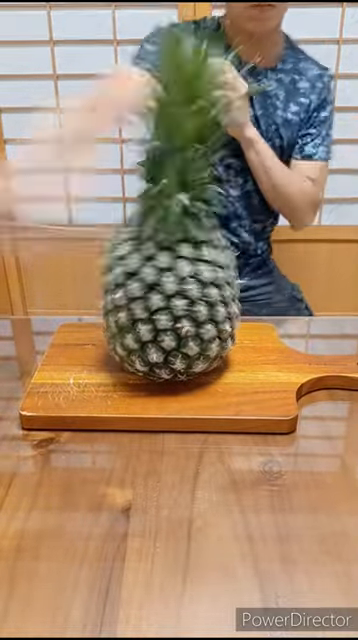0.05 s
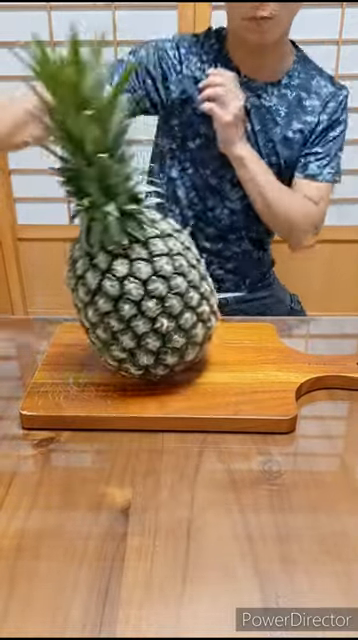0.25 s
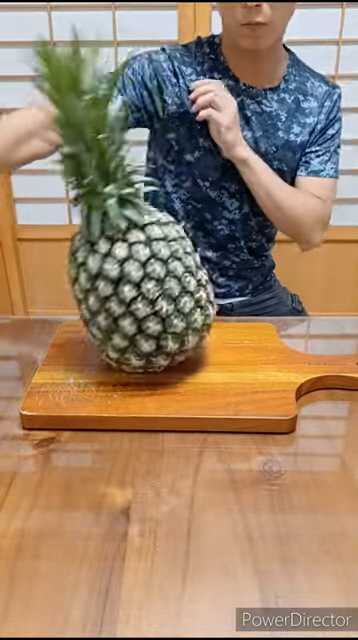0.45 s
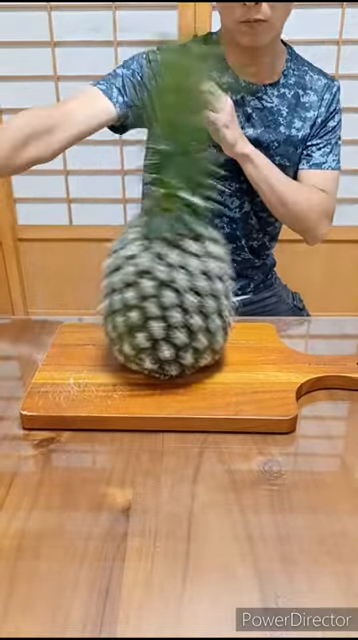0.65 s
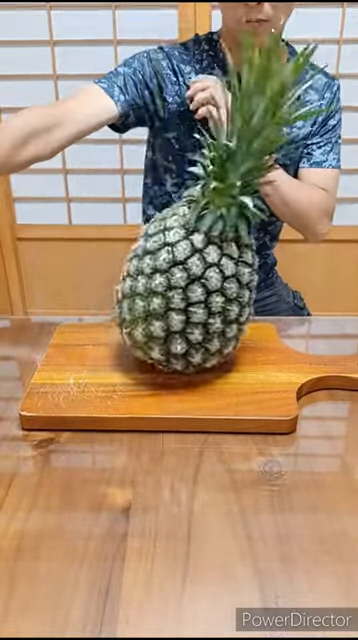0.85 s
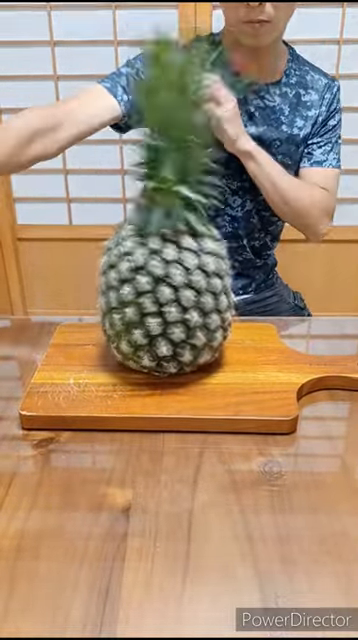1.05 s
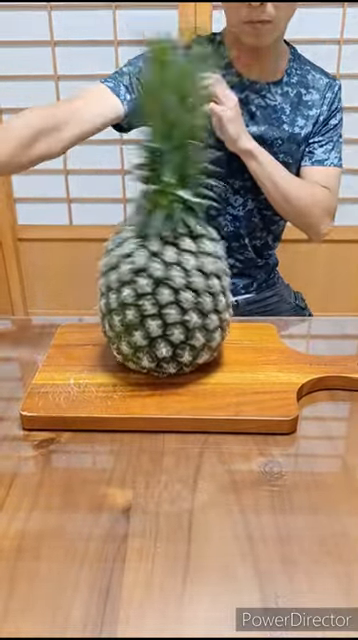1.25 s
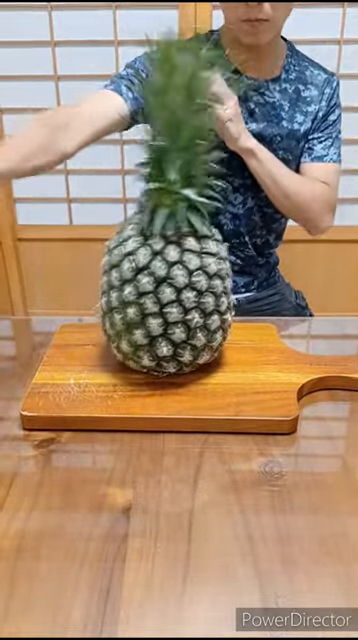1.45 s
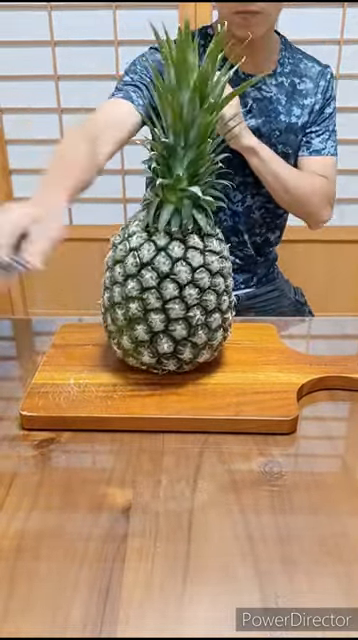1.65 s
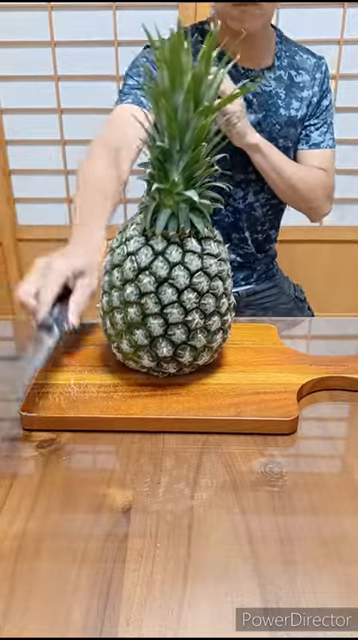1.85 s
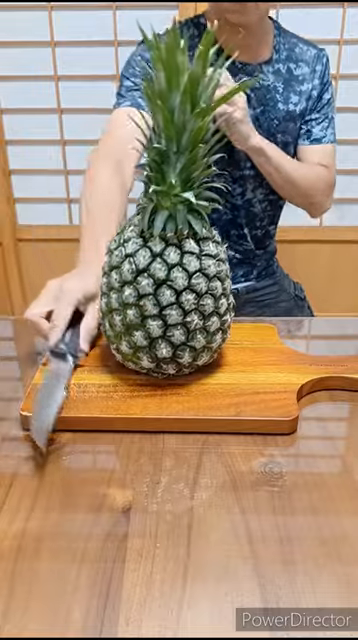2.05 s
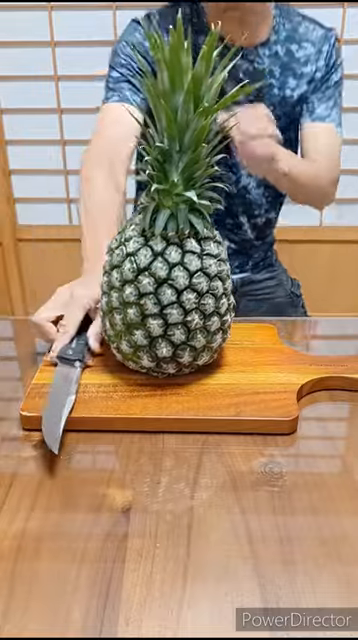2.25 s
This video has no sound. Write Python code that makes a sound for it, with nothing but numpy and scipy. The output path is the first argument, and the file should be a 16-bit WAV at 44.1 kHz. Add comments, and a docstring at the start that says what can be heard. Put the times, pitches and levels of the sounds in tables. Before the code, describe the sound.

A knife chops sharply through a pineapple on a wooden board, then the fruit rocks softly.

```python
"""One fast knife stroke through a pineapple on a wooden board on a table, in a bare, ringing room.
The swing swishes in. At 0.2 s the blade splits the rind, knocks fruit and board and tears the fibres;
the steel rings, the table top hums, and the sleeve flaps as the arm stops.
From 0.6 s the fruit rocks to rest with low thuds: its base rumbles, the wet cut crackles, the rind ticks.
Its leaves rustle on the last tilts and the sleeve brushes back, over a quiet room tone."""
import sys
import numpy as np
from scipy import signal
from scipy.fft import rfft, irfft, next_fast_len
from scipy.io import wavfile

SR = 44100
rng = np.random.default_rng(int(sys.argv[2]) if len(sys.argv) > 2 else 0)


def inscribe(sig):
    """Save sig as 16-bit PCM at rate SR to the path in sys.argv[1].

    A 1-D sig is mono; a 2-D sig holds one channel per row.
    Samples are clipped to [-1, 1] before scaling.
    """
    pcm = np.round(np.clip(np.atleast_2d(sig).T, -1, 1) * 32767)
    wavfile.write(sys.argv[1], SR, pcm.astype(np.int16))


N = 101429
T = np.arange(N) / SR
CUT_S, TABLE_PAN_DB = .1972, -2

# blade blows: t/s, length/s, f/Hz, thump level/dB, board drive/dB
KNOCKS = [(.1990, .011, 256, -17.5, -24.5), (.2090, 0.017, 126.9, -23, -35), (.2250, .012, 204.8, -19, -33)]
# landings of the rocking fruit: t/s, length/s, f/Hz, level/dB
THUDS = [(.8135, 0.035, 120.8, -33), (1.188, 0.027, 119, -46), (1.222, 0.036, 90, -47),
         (1.426, .042, 117.8, -42), (1.474, 0.029, 115, -49.5), (1.598, 0.044, 107, -48.5),
         (1.632, 0.022, 101, -47.5)]


def cut():
    """Fibres snap in a dense burst as the blade passes."""
    # snap spectrum: f/Hz, relative density/dB
    spectrum = [(200, -8.5), (600, 2), (1150, -7), (1900, 2.5), (2300, 1.5), (2800, 3), (3800, -1),
                (6000, -4.5), (9000, -8), (13500, -3), (16000, -14)]
    snaps = stereo(grains(per_s=9000, spread_db=2), spectrum, width=1.25)
    return from_db(-27) * burst(CUT_S, attack_s=.0057, hold_s=.019, t60_s=.1) * snaps


def splits():
    """The hard rind bursts ahead of the blade in short, bright cracks."""
    # cracks: t/s, level/dB
    cracks = [(0.1984, -27), (0.2043, -25.5), (.2120, -29)]
    # crack spectrum: f/Hz, relative density/dB
    spectrum = [(400, -6), (900, 1.5), (2000, -6.5), (4000, -8), (7500, 4.5), (11000, -1.5), (14000, -0.5),
                (16000, -5.5)]
    envelope = bursts(cracks, attack_s=.0008, hold_s=.0026, t60_s=.022)
    return envelope * stereo(grains(per_s=16000, spread_db=1.5), spectrum)


def knocks():
    """The blade meets rind, core and far rind; each blow passes into the board."""
    thumps = bumps([row[:4] for row in KNOCKS])
    ring = board([(s + .0005, drive_db) for s, _, _, _, drive_db in KNOCKS])
    return panned(lagged(thumps + ring, right_lag_s=-.00015), db=-1)


def board(blows):
    """Blows (t/s, level/dB) ring the modes of fruit, board and table."""
    # modes: f/Hz, gain/dB, t60/s
    modes = [(89.2, -14, 0.12), (129.06, -6, .4), (207.9, -6, .21), (245, -10, .36), (273.3, -5.5, .18),
             (336.2, -3.5, .17), (433.8, -0.5, 0.1891), (556, -9.5, 0.22), (617.3, -12, .19),
             (699, -17, .16), (951.6, -18, .11)]
    impulses, ring = np.full(N, 1e-18), 0
    for s, db in blows:
        impulses[int(s * SR)] += from_db(db)
    for k, (hz, db, t60_s) in enumerate(modes):
        radius, angle = np.exp(-np.log(1000) / (t60_s * SR)), 2 * np.pi * hz / SR
        mode = signal.lfilter([0, np.sin(angle)], [1, -2 * radius * np.cos(angle), radius ** 2], impulses)
        ring = ring + (-1) ** k * from_db(db) * mode
    return butterworth(ring, "high", hz=79)


def blade():
    """The struck steel rings on; each mode has its own phase on each side."""
    # modes: f/Hz, level/dB, t60/s
    modes = [(1610, -45, .75), (1953, -37, .4), (2758, -36, .45), (3183, -40, .45), (7943, -41, .3)]
    phases = rng.uniform(0, 2 * np.pi, (len(modes), 2, 1))
    return sum(from_db(db) * burst(CUT_S, .015, 0, t60_s) * np.sin(2 * np.pi * hz * T + phase)
               for (hz, db, t60_s), phase in zip(modes, phases))


def thuds():
    """Each soft landing of the rocking fruit thumps and faintly rings the board."""
    ring = board([(s + .01203, db - 20.5) for s, _, _, db in THUDS])
    soft_ring = butterworth(ring, "low", hz=300)
    return panned(lagged(bumps(THUDS) + soft_ring, right_lag_s=.0004), TABLE_PAN_DB)


def swing():
    """Blade and sleeve hiss and push a puff of air; both swell until the blade lands."""
    # hiss spectrum: f/Hz, relative density/dB
    hiss_spectrum = [(200, 5.5), (600, 4.5), (1500, -6), (5000, -6), (11000, -7), (16000, -12)]
    # pushed-air spectrum: f/Hz, relative density/dB
    puff_spectrum = [(30, -32), (90, -9.5), (200, 0.5), (400, -10.5), (1000, -21), (4000, -43.5)]
    start_s, attack_s, hiss_db_per_s, puff_db_per_s = .087, .02, 139.5, 422
    gate = burst(start_s, attack_s, hold_s=CUT_S - start_s - attack_s, t60_s=.05)
    until_cut_s = np.maximum(CUT_S - T, 0)
    hiss = from_db(-63 - hiss_db_per_s * until_cut_s) * stereo(noise(), hiss_spectrum)
    puff = from_db(-46.5 - puff_db_per_s * until_cut_s) * stereo(noise(), puff_spectrum)
    return gate * (hiss + puff)


def sleeve():
    """The sleeve flaps as the arm stops and brushes as it comes back."""
    # rustles: t/s, hold/s, level/dB
    rustles = [(0.405, 0.023, -47), (0.518, 0.0082, -77), (1.724, 0.083, -82.5)]
    # cloth spectrum: f/Hz, relative density/dB
    spectrum = [(200, -7), (700, 0), (1300, 0.5), (2200, 5.5), (3500, -1.5), (6000, -8), (10000, -16.5),
                (16000, -22)]
    envelope = sum(from_db(db) * burst(s, .012, hold_s, t60_s=.18) for s, hold_s, db in rustles)
    return envelope * stereo(grains(per_s=8500, spread_db=1), spectrum)


def tilts():
    """The wet cut crackles and the knobbly base rumbles as the fruit rolls."""
    # rolls: t/s, attack/s, hold/s, crackle level/dB, rumble level/dB
    rolls = [(0.63, .025, 0.054, -84.5, -69), (0.833, 0.0043, 0.036, -66.5, -52),
             (1.201, 0.016, 0.023, -72, -58), (1.278, 0.014, 0.09, -106, -65),
             (1.428, .015, 0.069, -83.5, -64.5), (1.581, .015, 0.1, -83.5, -62.5)]
    # wet-cut spectrum: f/Hz, relative density/dB
    crackle_spectrum = [(300, 3.5), (1200, -10), (2300, 1), (3500, -2.5), (6000, -2), (9000, -4),
                        (13500, -4), (16000, -13)]
    # rolling-base spectrum: f/Hz, relative density/dB
    rumble_spectrum = [(25, -14), (55, 0), (110, -11), (170, -3.5), (240, 5), (340, -6.5), (500, -16.5),
                       (900, -24.5), (3000, -53)]
    crackle = stereo(grains(per_s=3500, spread_db=1), crackle_spectrum)
    rumble = panned(stereo(noise(), rumble_spectrum), TABLE_PAN_DB)
    out = 0
    for s, attack_s, hold_s, crackle_db, rumble_db in rolls:
        envelope = burst(s, attack_s, hold_s, t60_s=.21)
        out = out + envelope * (from_db(crackle_db) * crackle + from_db(rumble_db) * rumble)
    return out


def sway():
    """The first knock and each landing leave the table top swaying in a faint, deep hum."""
    hz, t60_s = 52.57, .63
    knock_s, _, _, knock_db, _ = KNOCKS[0]
    blows = [(knock_s, knock_db - 39)] + [(s, db - 24) for s, _, _, db in THUDS]
    hum = sum(from_db(db) * burst(s, .027, 0, t60_s) * np.sin(2 * np.pi * hz * (T - s)) for s, db in blows)
    return panned(hum, TABLE_PAN_DB)


def ticks():
    """Knobs of the rind touch the wood with a tiny crunch."""
    # contacts: t/s, level/dB
    contacts = [(0.816, -68), (1.185, -69.5), (1.567, -73.5)]
    # contact spectrum: f/Hz, relative density/dB
    spectrum = [(400, 0), (1000, 2), (1350, 5), (1900, -2), (2400, -3.5), (3500, -4.5), (7000, -13),
                (16000, -15)]
    envelope = bursts(contacts, attack_s=.0019, hold_s=.0036, t60_s=.065)
    return envelope * stereo(grains(per_s=3700, spread_db=-4.5), spectrum)


def leaves():
    """Stiff leaves brush each other in soft, bright swells."""
    # shakes of the crown: t/s, level/dB
    shakes = [(1.44, -76), (1.553, -73.5), (1.69, -87)]
    # leaf spectrum: f/Hz, relative density/dB
    spectrum = [(500, -12), (2000, 0), (3500, -5), (5200, 1), (7500, 2), (10000, -5), (13000, -7.5),
                (16000, -9)]
    envelope = bursts(shakes, attack_s=.028, hold_s=.033, t60_s=.25)
    return envelope * stereo(grains(per_s=12000, spread_db=1.5), spectrum)


def room_response():
    """A diffuse 1 s tail builds up quickly and dies at its own rate in each octave; unit energy."""
    # room decay: f/Hz, t60/s
    decay = [(60, 0.45), (200, 0.38), (600, 0.39), (2000, 0.34), (5000, 0.4), (10000, .42), (16000, 0.31)]
    delay_s, build_s, t = .0044, .008, T[:SR]
    bins = rfft(stereo(noise(), [(20, 0), (20000, 0)], width=1.1)[:, :SR])
    log_hz = np.log(np.maximum(np.arange(SR // 2 + 1), 1))
    centres_hz, tail = np.geomspace(60, 15360, 9), 0
    for hz, weights in zip(centres_hz, np.eye(len(centres_hz))):
        octave = irfft(bins * np.interp(log_hz, np.log(centres_hz), weights), SR)
        tail = tail + octave * 1e-3 ** (t / at_hz(decay, hz))
    return rms_one(tail * np.clip((t - delay_s) / build_s, 0, 1)) / np.sqrt(SR)


def room_tone():
    """Quiet, steady noise, mostly bass."""
    # room-tone spectrum: f/Hz, relative density/dB
    spectrum = [(25, -47), (40, -27), (56, -6.5), (75, -15), (126, -3.5), (178, -9), (232, -1), (297, -10),
                (400, -16), (552, -14.5), (900, -19), (1800, -32), (4400, -39.5), (9300, -41),
                (15500, -38.5)]
    return panned(from_db(-68) * stereo(noise(), spectrum), db=-.22)


def from_db(db):
    """Decibels to gain."""
    return 10 ** (np.asarray(db) / 20)


def rms_one(x):
    """Scale to rms 1."""
    return x / np.sqrt(np.mean(x ** 2) + 1e-20)


def at_hz(points, hz):
    """Read a table on a log-frequency axis."""
    points_hz, values = np.transpose(points)
    return np.interp(np.log(np.maximum(hz, 1)), np.log(points_hz), values)


def butterworth(x, kind, hz):
    """Second-order low-pass or high-pass."""
    return signal.sosfilt(signal.butter(2, hz, kind, fs=SR, output="sos"), x)


def noise():
    """Two white noises."""
    return rng.standard_normal((2, N))


def grains(per_s, spread_db):
    """Two streams of tiny snaps of uneven size."""
    size = from_db(spread_db * np.minimum(rng.exponential(1, (2, N)), 4))
    return size * rng.choice([-1, 1], (2, N)) * (rng.random((2, N)) < per_s / SR)


def burst(start_s, attack_s, hold_s, t60_s):
    """Linear attack, hold, exponential release."""
    release_s = np.maximum(T - start_s - attack_s - hold_s, 0)
    return np.clip((T - start_s) / attack_s, 0, 1) * 1e-3 ** (release_s / t60_s)


def bursts(events, attack_s, hold_s, t60_s):
    """Envelope with one burst per event (t/s, level/dB)."""
    return sum(from_db(db) * burst(s, attack_s, hold_s, t60_s) for s, db in events)


def bumps(blows):
    """Each blow on soft fruit swells and fades within a few low cycles."""
    out = 0
    for s, length_s, hz, db in blows:
        window = np.sin(np.pi * np.clip((T - s) / length_s, 0, 1)) ** 2
        out = out + from_db(db) * window * np.sin(2 * np.pi * hz * (T - s))
    return out


def stereo(streams, spectrum, width=1):
    """Colour two streams and mix them as mid and side, the bass alike left and right; rms 1."""
    # left-right likeness: f/Hz, correlation at width 1
    likeness = [(60, 1), (300, 0.8), (600, 0.55), (1200, 0.16), (4000, 0.16), (16000, 0.18)]
    size = next_fast_len(N)
    hz = np.arange(size // 2 + 1) * SR / size
    gain = from_db(at_hz(spectrum, hz)) * hz ** 2 / (hz ** 2 + 25 ** 2)  # roll-off below 25 Hz
    apart = np.clip((1 - at_hz(likeness, hz)) * width, 0, 1)
    mid, side = rfft(streams, size) * gain * np.sqrt([2 - apart, apart])
    return rms_one(irfft(np.array([mid + side, mid - side]), size)[:, :N])


def panned(x, db):
    """Left +db, right -db: negative leans right."""
    return x * from_db(db * np.array([[1], [-1]]))


def lagged(x, right_lag_s):
    """Mono to stereo, the right side shifted in time."""
    return np.array([x, np.interp(T - right_lag_s, T, x)])


def scene():
    """Sources sound directly and through the room; sway, swing and room tone stay dry."""
    # signal, room send/dB
    sources = [(splits(), -12), (cut(), 2), (blade(), -12), (knocks(), -7.5), (sleeve(), -8),
               (thuds(), -6.5), (ticks(), 4), (tilts(), -3.5), (leaves(), -3)]
    direct = sum(x for x, _ in sources)
    send = butterworth(sum(from_db(db) * x for x, db in sources), "high", hz=30)
    reverb = signal.fftconvolve(send, room_response(), axes=1)[:, :N]
    return direct + reverb + sway() + swing() + room_tone()


def record(dry):
    """Steep elliptic low-pass."""
    cutoff_hz = 15050
    return signal.sosfilt(signal.ellip(10, .2, 80, cutoff_hz, fs=SR, output="sos"), dry)


dry = scene()
out = record(dry)
inscribe(out)
```